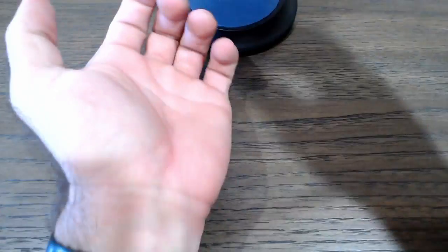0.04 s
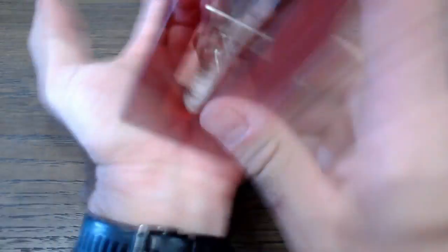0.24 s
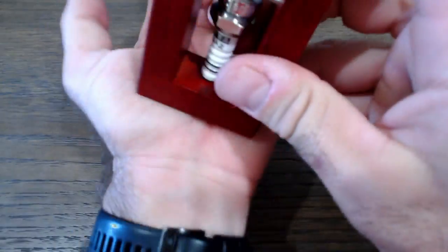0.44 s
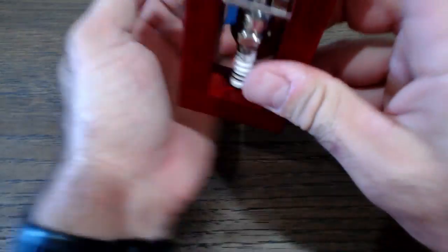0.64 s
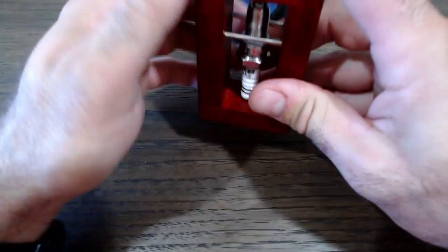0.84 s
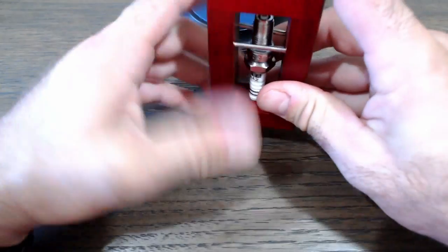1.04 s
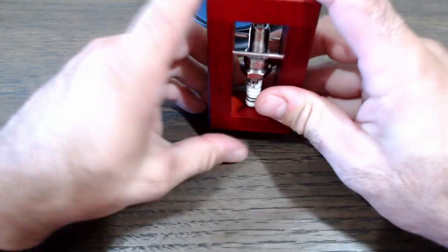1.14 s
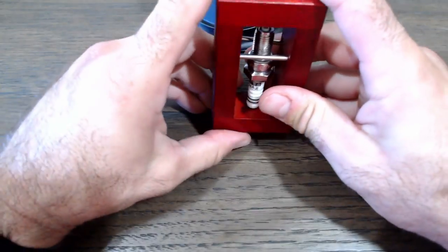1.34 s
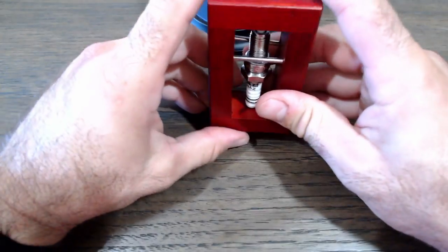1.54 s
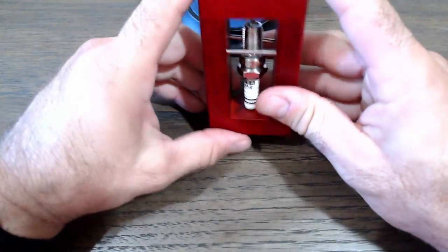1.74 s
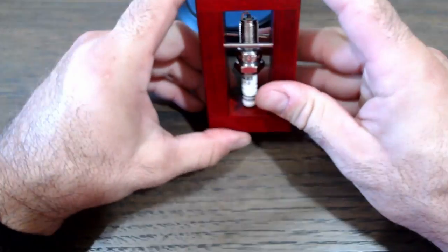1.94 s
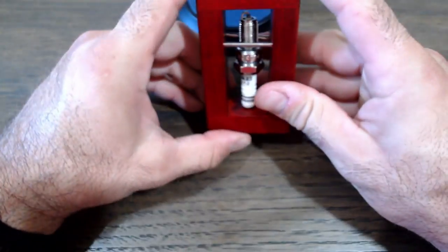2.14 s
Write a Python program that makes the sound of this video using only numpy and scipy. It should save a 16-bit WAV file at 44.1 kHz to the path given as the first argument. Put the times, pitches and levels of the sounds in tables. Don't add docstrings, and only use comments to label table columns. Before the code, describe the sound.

A small wooden frame holding loose metal parts is struck once on a palm, a bright rattle and hollow knock with low table boom, close microphone in a hard-walled room, then quiet fidgeting, ticks and soft thumps.

```python
import sys
import numpy as np
from scipy import signal
from scipy.io import wavfile
from scipy.ndimage import uniform_filter1d

SR = 44100
rng = np.random.default_rng(int(sys.argv[2]) if len(sys.argv) > 2 else 0)


def master(y):
    cut = np.clip(np.atleast_2d(y).T, -1, 1)
    pcm = np.round(cut * 32767)
    wavfile.write(sys.argv[1], SR, pcm.astype(np.int16))


def field_ratio(decibels):
    return 10 ** (np.asarray(decibels, dtype=float) / 20)


N = 97020
T = np.arange(N) / SR


def at_hz(points, hz):
    p = np.array(points, float)
    return [np.interp(np.log(hz), np.log(p[:, 0]), column) for column in p.T[1:]]


def clicks(times_s, gain):
    out = np.full(N, 1e-18)
    np.add.at(out, (np.asarray(times_s) * SR).astype(int), gain)
    return out


def burst(start_s, decay_s):
    return rng.standard_normal(N) * (T >= start_s) * np.exp(-np.abs(T - start_s) / decay_s)


def soft(x, hz):
    r = np.exp(-2 * np.pi * min(hz, 20000) / SR)
    return signal.lfilter([(1 - r) ** 2], [1, -2 * r, r * r], x)


def ring(x, hz, t60_s):
    r = field_ratio(-60 / (t60_s * SR))
    w = 2 * np.pi * hz / SR
    return signal.lfilter([0, np.sin(w)], [1, -2 * r * np.cos(w), r * r], x)


def band_pass(x, order, low_hz, high_hz):
    return signal.sosfilt(signal.butter(order, [low_hz, high_hz], "band", fs=SR, output="sos"), x)


def noise_bands():
    edges_hz = 14 * 2 ** np.arange(0, 10.4, 1 / 5)
    white = rng.standard_normal((2, N + SR))
    for k, (low, high) in enumerate(zip(edges_hz, edges_hz[1:])):
        yield np.sqrt(low * high), band_pass(white[k % 2], 2, low, high)[SR:]


# (frequency [Hz], level [dB rms])
HUM = [(59.8, -59), (119.6, -75), (179.4, -78)]
# (frequency [Hz], density [dB per Hz])
ROOM_NOISE = [(12, -11), (22, -0.5), (40, -13.5), (90, -18), (180, -17.5), (330, -26), (1500, -37),
              (16000, -50.5)]


def background():
    level_db, patchy_db, smooth_above_hz = -62.5, 5.5, 180
    noise = 0
    for hz, band in noise_bands():
        slow = np.interp(T, np.linspace(0, T[-1], 30), rng.standard_normal(30))
        wander_db = patchy_db * slow / (1 + hz / smooth_above_hz)
        noise = noise + band * field_ratio(at_hz(ROOM_NOISE, hz)[0] + wander_db)
    hum = sum(field_ratio(db + 1.5) * np.sin(2 * np.pi * hz * T) for hz, db in HUM)
    return field_ratio(level_db) * noise / noise.std() + hum


# (start [s], length [s], level [dB],
# centre [Hz], band factor either side [ratio])
RUBS = [(0.02, 0.039, -65, 1490, 2.05), (0.09, 0.04, -68.5, 5050, 1.5), (0.125, 0.041, -54, 3600, 2.1),
        (0.127, 0.037, -59, 12500, 1.23), (0, 0.15, -57.5, 806, 1.58), (1.219, .07, -36, 150, 1.4),
        (1.178, .025, -52, 800, 1.2), (0.2162, 0.011, -38, 3600, 1.4), (0.16, .07, -53, 1003, 1.8),
        (0.536, 0.068, -72.5, 10010, 1.6), (0.999, 0.068, -71.5, 5000, 1.43),
        (1.106, 0.063, -64, 5450, 1.3), (1.122, 0.062, -70, 7955, 1.35), (1.248, 0.03, -54, 1132, 1.54),
        (1.602, 0.1, -61.5, 2200, 1.27), (2.109, 0.026, -63, 1900, 1.76), (2.132, 0.034, -61, 2200, 1.68),
        (2.183, 0.027, -62.5, 2200, 1.75)]


def rubs():
    grain_db = 20 * uniform_filter1d(rng.standard_normal(N), size=100)
    noise = rng.standard_normal(N) * field_ratio(grain_db)
    out = 0
    for s, length_s, db, hz, width in RUBS:
        swell = np.sin(np.pi * np.clip((T - s) / length_s, 0, 1) ** .5)
        out = out + field_ratio(db) * band_pass(noise, 2, hz / width, hz * width) * swell
    return out


# (time [s], level [dB], frequency [Hz], t60 [s])
THUMPS = [(.01, -54.5, 164.5, 0.21), (0.034, -52, 300, 0.048), (0.994, -47, 185, 0.093),
          (.99, -51, 90, 0.098), (1.069, -50.5, 182.9, 0.092), (1.121, -49, 127.9, 0.097),
          (1.22, -41.5, 93.8, 0.33), (1.219, -41, 185, 0.043), (1.24, -39.5, 150, 0.11),
          (1.248, -53, 323, 0.061), (1.262, -38.5, 194.7, 0.068), (1.61, -56.5, 200.3, .15),
          (1.65, -51.5, 120.7, 0.11)]


def thumps():
    return sum(ring(soft(clicks([s], field_ratio(db)), 7.5 * hz), hz, t60) for s, db, hz, t60 in THUMPS)


# (time [s], level [dB], frequency
# [Hz], t60 [s])
TICKS = [(.032, -52, 3500, 0.0012), (.05, -62.5, 6290, 0.0031), (.076, -56, 6900, 0.0038),
         (.094, -68, 7500, .006), (0.1273, -45.5, 2780, 0.019), (0.1308, -53, 2760, 0.026),
         (0.137, -49, 2980, .015), (0.168, -56, 3000, .012), (.2292, -7, 4310, .009),
         (.2305, -1, 2460, .006), (.2785, -18, 1900, .012), (.289, -24.5, 975, 0.072),
         (.133, -68, 12100, 0.0044), (0.1377, -31.5, 12700, 0.0048), (.1375, -45, 10750, 0.025),
         (.1375, -40, 14200, .006), (.151, -52, 15200, .008), (.128, -58, 9700, .03),
         (.142, -50, 13000, 0.0063), (.151, -52, 9802, 0.04), (.1515, -49, 2920, 0.012),
         (.1605, -52, 2900, 0.016), (.179, -48, 3500, 0.0019), (.545, -57, 8020, 0.028),
         (.997, -65, 8000, 0.052), (.998, -58, 4935, 0.012), (1.11, -65.5, 6604, 0.014),
         (1.186, -63, 783, 0.027), (1.243, -54, 3830, 0.0017), (1.251, -45.5, 1499, 0.0034),
         (1.249, -47, 3000, .003), (1.53, -53.5, 3954, 0.0019), (1.5979, -30.5, 5200, .006),
         (1.59867, -32, 5500, 0.0064), (1.6003, -39.5, 4502, 0.0072), (1.6021, -43, 4597, 0.0066),
         (1.608, -65, 8010, 0.12), (1.652, -69, 7990, .1), (2.134, -60.5, 3310, .015),
         (2.15, -60.5, 3600, .015), (1.12, -62, 5400, .02), (1.138, -59, 5607, 0.016)]


def ticks():
    crack_db, crack_s, pair_cycles = -15.5, 0.00044, 1.1
    out = 0
    for s, db, hz, t60 in TICKS:
        click = clicks([s], field_ratio(db) / 2)
        pair = sum(ring(click, hz + side * pair_cycles / t60, t60) for side in (-1, 1))
        pair = band_pass(pair, 1, hz / 2, min(hz * 2, 20000))
        crack = soft(soft(burst(s, crack_s), 3.1 * hz), 3.1 * hz)
        out = out + pair + field_ratio(db + crack_db) * np.diff(crack, prepend=0)
    return out


# (time [s], level [dB], frequency [Hz])
CREAKS = [
    (.1525, -44.5, 580),
    (.168, -42.5, 580),
    (.187, -42, 580),
    (.201, -46.5, 558.6),
    (1.217, -61.5, 540),
    (2.108, -48, 590.3),
    (2.113, -58, 497),
    (2.137, -46.5, 600),
    (2.142, -54.5, 510),
    (2.19, -47.5, 587),
]


def creaks():
    return sum(ring(soft(clicks([s], field_ratio(db)), 1300), hz, .022) for s, db, hz in CREAKS)


# (crest [s], level [dB], width [s])
PUSH = [
    (.197, -37.5, 0.0083),
    (.2305, -8, 0.00079),
    (.2345, -14, 0.0034),
]
# (frequency [Hz], level [dB], t60 [s], delay after knock [s])
TABLE = [(26.2, -17.5, 0.91, 0.034), (39.5, -16.5, 0.093, 0.0668), (87.8, -12.5, 0.083, 0.014),
         (119.6, -14.5, 0.23, .012), (155.5, -18.5, 0.17, 0.0042), (207, -8.5, 0.14, 0.0039),
         (224, -7, 0.14, .0135), (227, -1, 0.033, .0235)]


def table():
    rise_hz, swell_db, swell_s, fall_s = 241, -29, .012, 0.0087
    push = 0
    for k, (s, db, width_s) in enumerate(PUSH):
        push = push + field_ratio(db) * (-1) ** (k + 1) * np.exp(-.5 * ((T - s) / width_s) ** 2)
    after_s = T - PUSH[1][0]
    swell = field_ratio(swell_db) * np.exp(-np.abs(after_s + 0.005) / swell_s) * np.exp(-np.maximum(after_s, 0) / fall_s)
    knock_s = KNOCKS[0][0]
    boom = sum(ring(clicks([knock_s + lag], field_ratio(db)), hz, t60) for hz, db, t60, lag in TABLE)
    return soft(boom, rise_hz) + push + swell


# (time [s], level [dB], contact cut-off [Hz], hollow clack [dB])
RATTLE = [(0.221, -38, 3999, -36), (0.228, -13.5, 5000, -22.5), (.229, -1, 7086, -30),
          (0.2287, -4.5, 15020, -6), (0.2308, -2, 15150, -9.5), (0.2319, -5, 19090, -19.5),
          (0.2351, -5, 8000, -2.5), (0.2407, -18.5, 8000, -25), (0.242, -23, 5000, -18),
          (0.2465, -17, 8000, -24), (0.2509, -6.5, 4494, -11.5)]
# (frequency [Hz], level [dB], t60 [s])
METAL = [(3500, -16.5, 0.0098), (4300, -5.5, 0.0067), (5000, -11, .008), (5870, -6.5, 0.0098),
         (6300, -8.5, 0.0096), (8240, -9.5, 0.0094), (9800, -12.5, .006), (12100, -16.5, 0.0015),
         (11894, -11, 0.0035), (13200, -14, .005)]


def rattle():
    crack_db, crack_s, part_spread, luck_db = -4.5, 0.00026, 0.048, 5.1
    out = 0
    for s, db, contact_hz, _ in RATTLE:
        modes = 0
        for hz, mode_db, t60 in METAL:
            level, sign, detune = rng.standard_normal(3)
            click = clicks([s], field_ratio(mode_db + luck_db * level) * np.sign(sign))
            modes = modes + ring(click, hz * (1 + part_spread * detune), t60)
        crack = field_ratio(crack_db) * np.diff(burst(s, crack_s), prepend=0)
        out = out + field_ratio(db) * soft(crack + modes, contact_hz)
    return out


def clack():
    strikes = np.array(RATTLE)
    return ring(clicks(strikes[:, 0], field_ratio(strikes[:, 3])), 2870, .012)


# (time [s], level [dB], contact cut-off [Hz])
KNOCKS = [
    (.2492, -4, 5000),
    (0.2499, -9.5, 5000),
    (0.2521, -12.5, 3000),
    (0.2548, -7, 2000),
    (0.2606, -10.5, 3500),
    (0.262, -16.5, 1200),
    (.278, -17, 2500),
    (0.291, -23, 1471),
]
# (frequency [Hz], level [dB], t60 [s])
WOOD = [(300, -17.5, 0.061), (372.9, -14.5, 0.018), (397.7, -14.5, 0.067), (507.1, -7.5, 0.027),
        (760, -18, .015), (880, -11.5, 0.023), (1003, -11.5, 0.036), (1200, -12, 0.031), (1347, -6, 0.011),
        (1734, -4, 0.01), (1900, -15.5, 0.029), (2276, -6, 0.025), (2460, -9.5, 0.015), (3320, -13, .006)]


def knock():
    pulse_db, rebound_db, luck_db = 1.5, -9.5, 2
    out = 0
    for k, (s, db, contact_hz) in enumerate(KNOCKS):
        hit = soft(soft(clicks([s], -field_ratio(db)), contact_hz), 2 * contact_hz)
        pulse = field_ratio(pulse_db + db) if k == 0 else -field_ratio(rebound_db + db)
        out = out + pulse * hit / np.abs(hit).max()
        for hz, mode_db, t60 in WOOD:
            out = out + field_ratio(mode_db + luck_db * rng.standard_normal()) * ring(hit, hz, t60)
    return out


# (frequency [Hz], level [dB], t60 [s])
RADIATED = [(150, -7.5, 0.017), (300, 1.5, 0.0066), (412, -6, .015), (580, -3, 0.0076), (935, -4.5, .016),
            (1360.6, -2.5, .01), (1872.6, -3.5, 0.0086), (2300, -3, .007), (2900, -3, 0.0035)]
# (time [s], level [dB])
RATTLE_TO_ROOM = [
    (0.2297, 15.5),
    (0.2344, 10),
]


def radiated():
    hit = clicks([KNOCKS[0][0]], 0.85)
    times_s, levels_db = np.array(RATTLE_TO_ROOM).T
    high_pass = signal.butter(2, 2200, "high", fs=SR, output="sos")
    cracks = signal.sosfilt(high_pass, clicks(times_s, field_ratio(levels_db)))
    return cracks + sum(field_ratio(db) * ring(hit, hz, t60) for hz, db, t60 in RADIATED)


# (frequency [Hz], early level [dB], early t60 [s], late level [dB], late t60 [s])
ROOM = [(100, -47, 0.55, -49.5, .5), (300, -45, 0.14, -48, 0.67), (600, -45, 0.34, -50, .8),
        (874, -43, 0.19, -41, 1), (1280, -43, .15, -46.5, 1.223), (1900, -40.5, .15, -42, 1.185),
        (2500, -38.5, .15, -47, 0.99), (3600, -39.5, .2, -47, 0.82), (6000, -39.5, 0.27, -52.5, 0.96),
        (9000, -40.5, 0.14, -53, 0.53), (14010, -42.5, 0.11, -55, 0.25)]


def room(x):
    first_echo_s = 0.0077
    tail = 0
    for hz, band in noise_bands():
        early_db, early_s, late_db, late_s = at_hz(ROOM, hz)
        tail = tail + band * (field_ratio(early_db - 60 * T / early_s) + field_ratio(late_db - 60 * T / late_s))
    tail = tail * np.clip(T / first_echo_s - .5, 0, 1)
    return signal.fftconvolve(x, tail)[:N]


def scene():
    fingers = rubs() + ticks() + creaks()
    hollow = clack()
    reflected = room(field_ratio(-3.5) * fingers + radiated() + field_ratio(-6) * hollow)
    puzzle = rattle() + knock() + hollow
    mix = background() + fingers + thumps() + table() + puzzle + reflected
    return mix[None]


def roll_off(x):
    return signal.sosfilt(signal.butter(12, 16840, fs=SR, output="sos"), x)


def record(dry):
    ceiling, cutoff_hz = 1.05, 16900
    rounded = ceiling * np.tanh(dry / ceiling)
    top_cut = signal.cheby2(12, 60, cutoff_hz, fs=SR, output="sos")
    return roll_off(signal.sosfilt(top_cut, rounded))


dry = scene()
out = record(dry)
master(out)
```